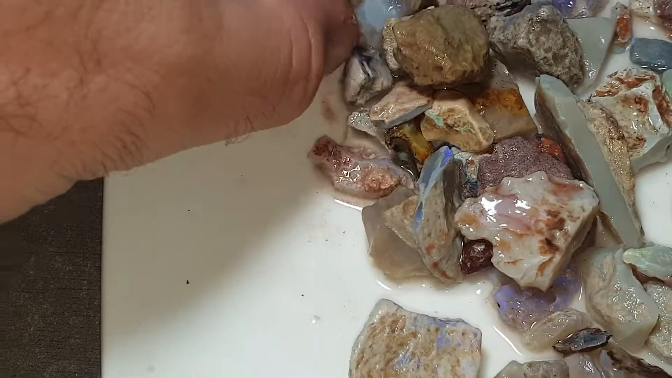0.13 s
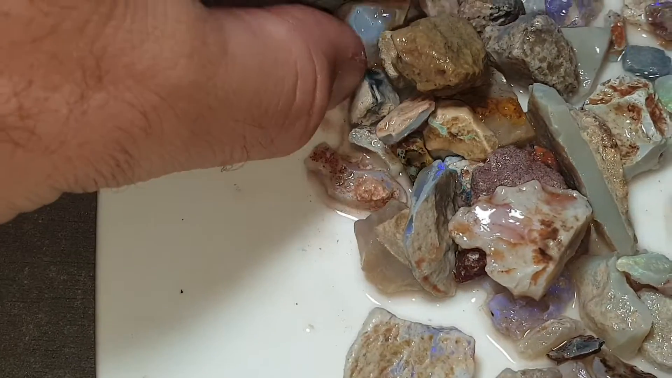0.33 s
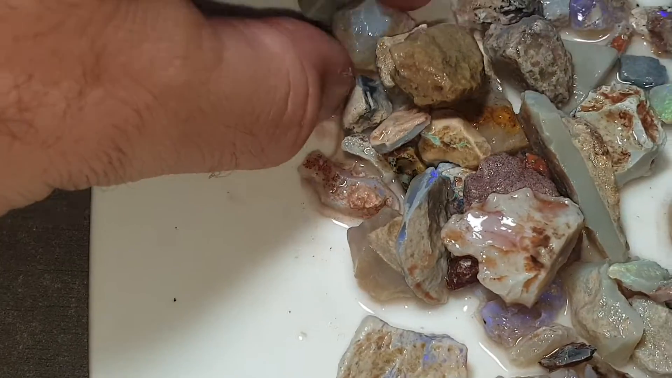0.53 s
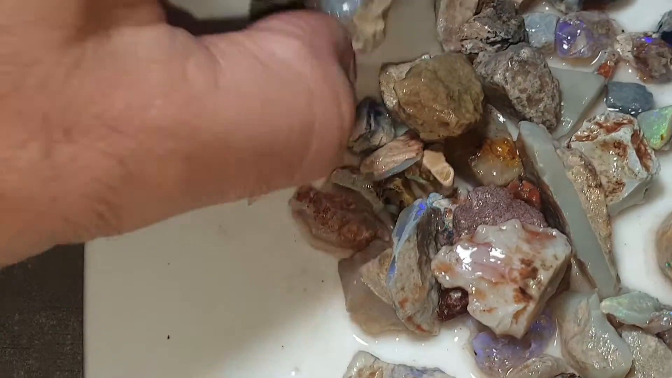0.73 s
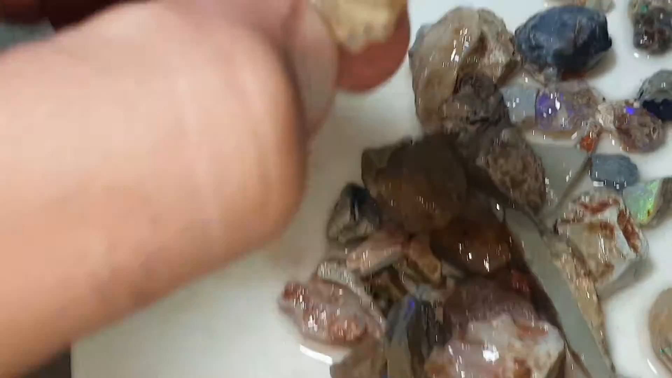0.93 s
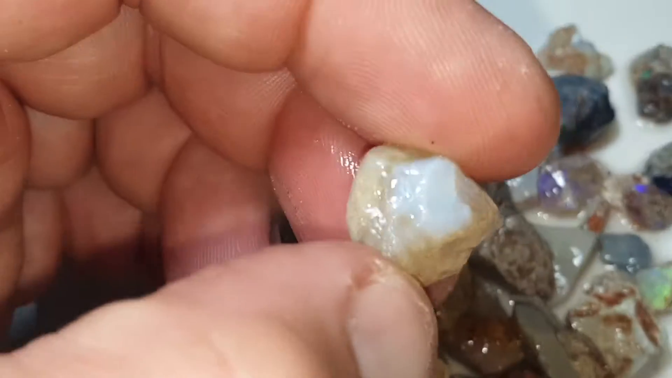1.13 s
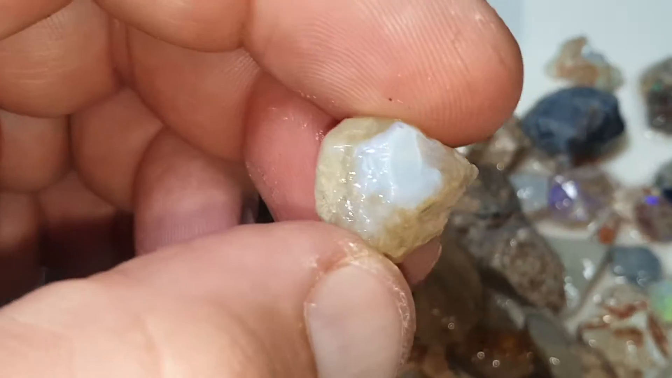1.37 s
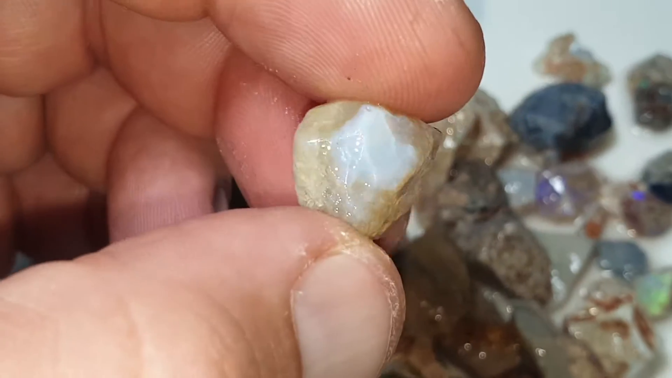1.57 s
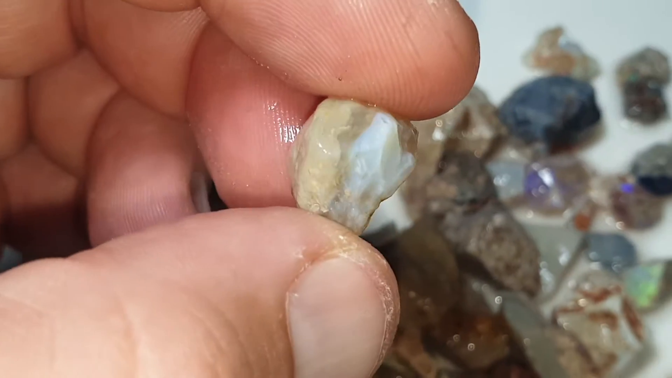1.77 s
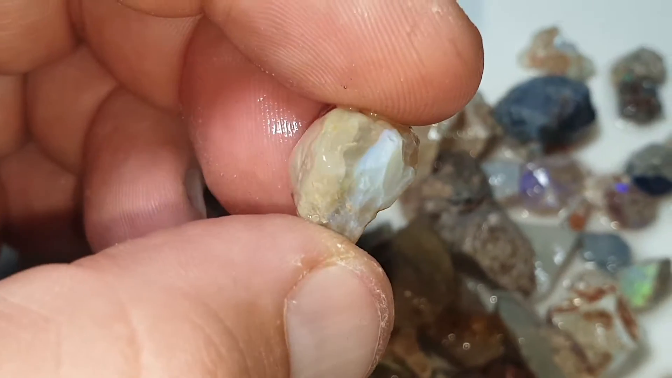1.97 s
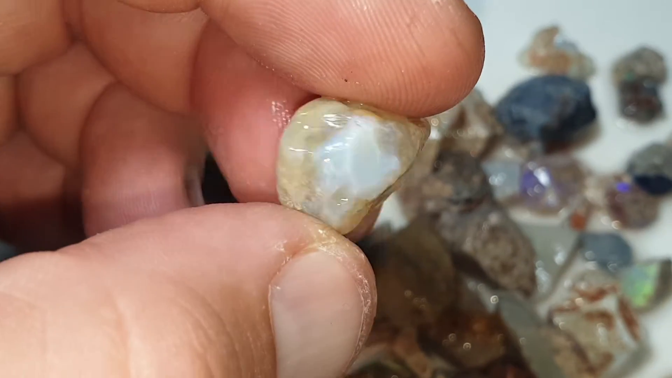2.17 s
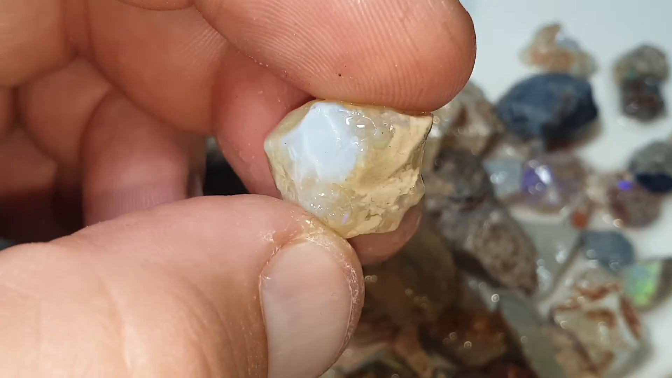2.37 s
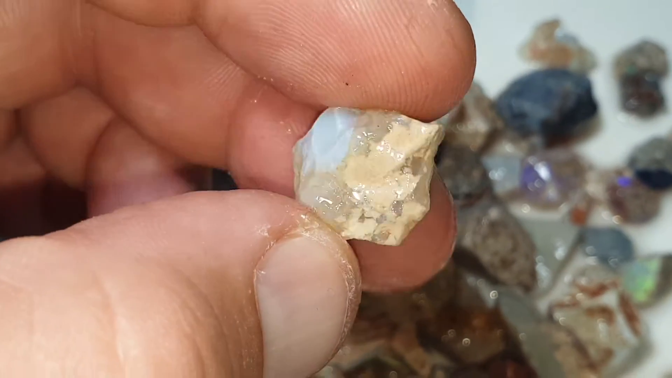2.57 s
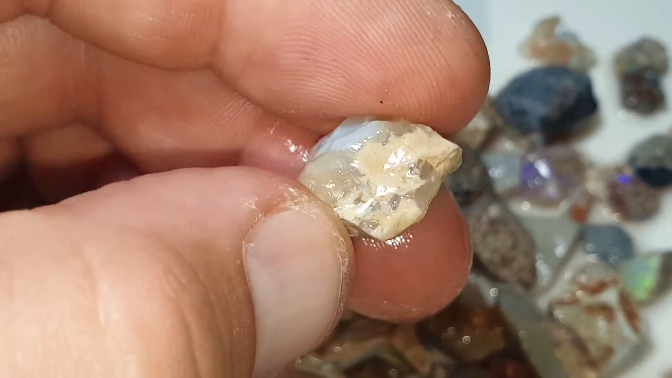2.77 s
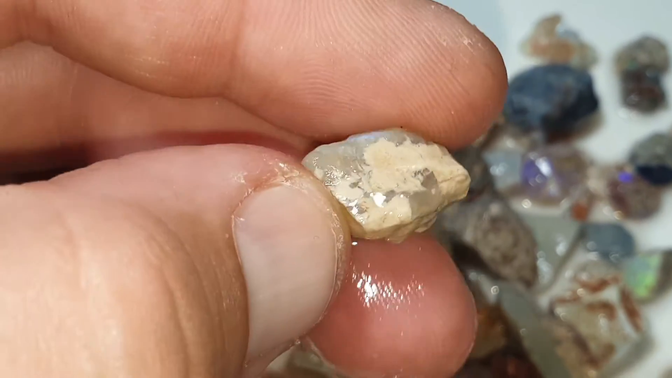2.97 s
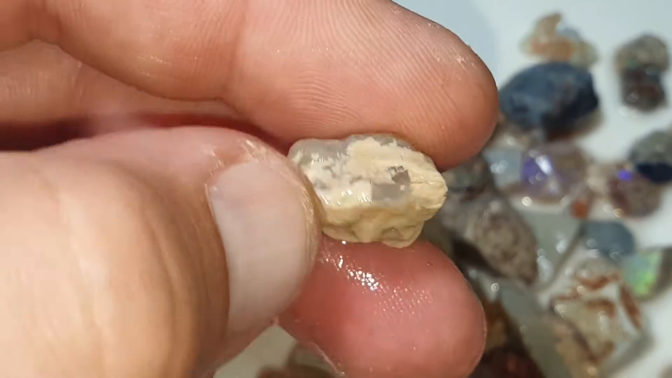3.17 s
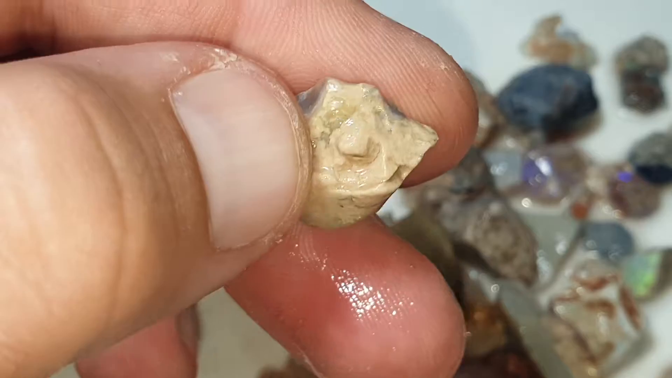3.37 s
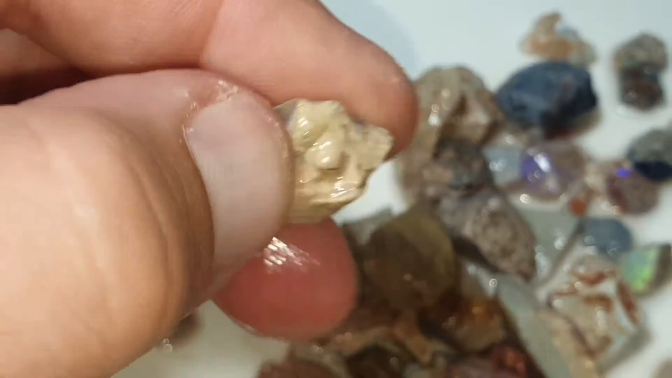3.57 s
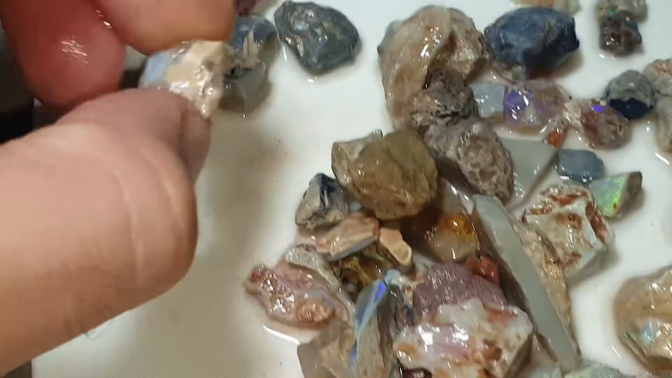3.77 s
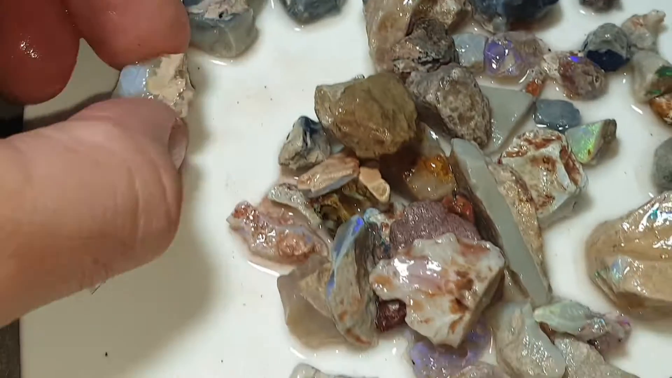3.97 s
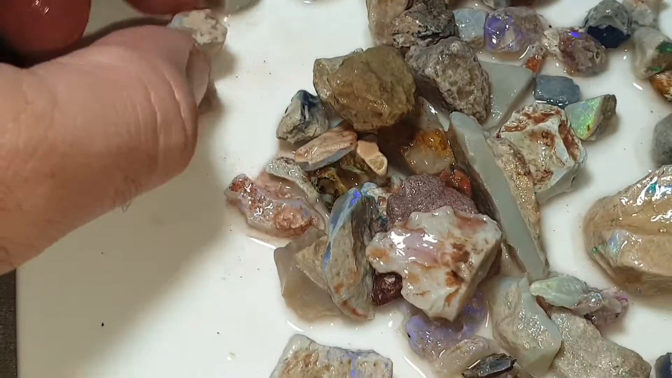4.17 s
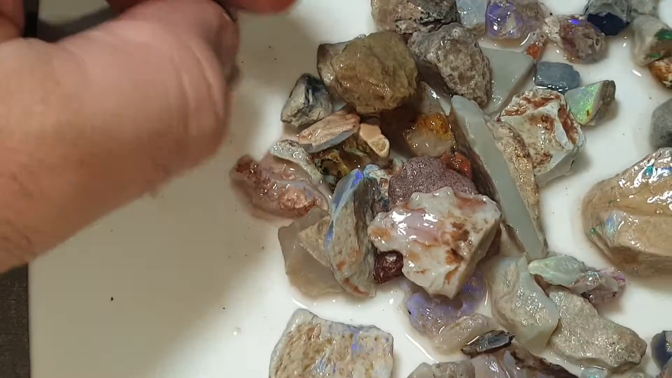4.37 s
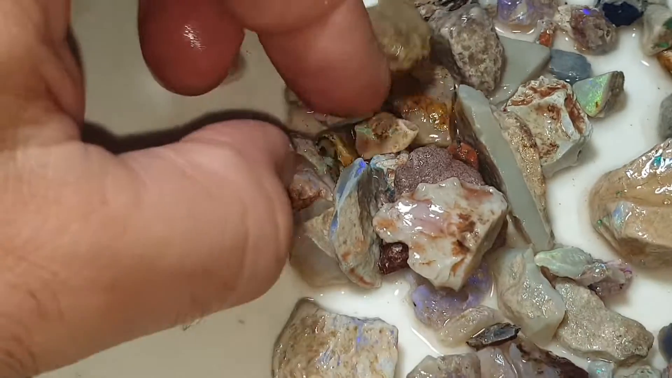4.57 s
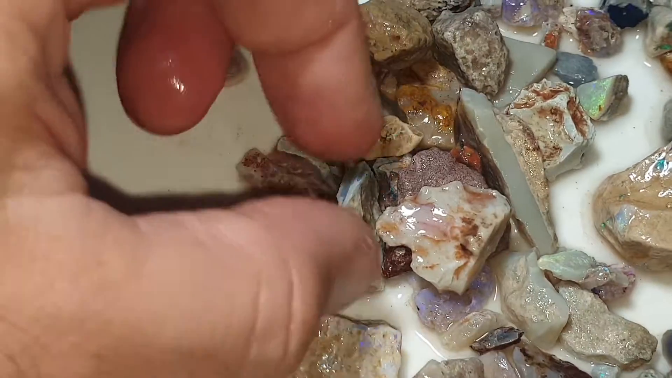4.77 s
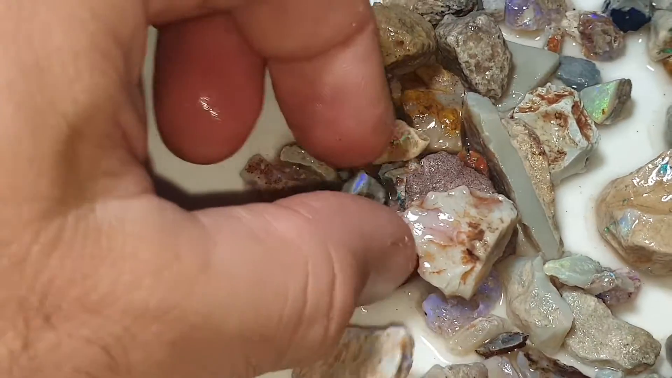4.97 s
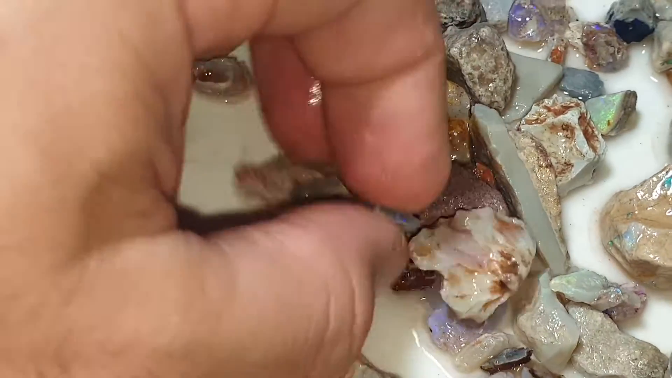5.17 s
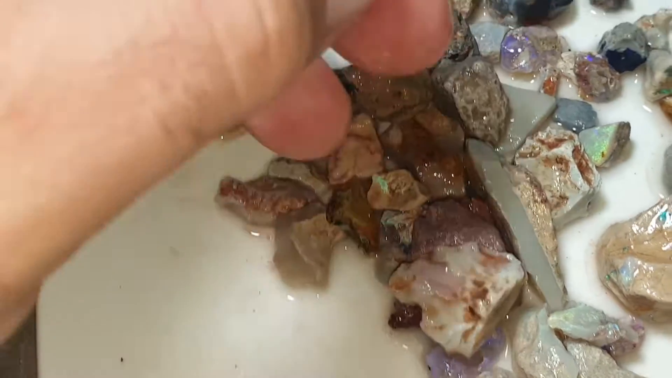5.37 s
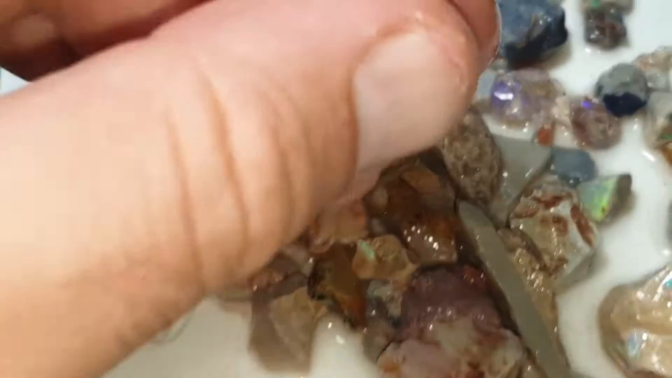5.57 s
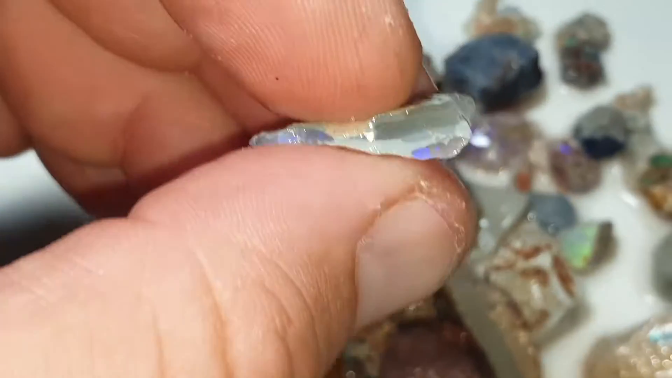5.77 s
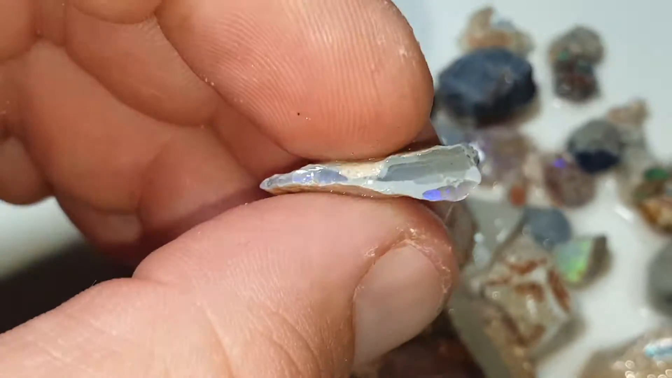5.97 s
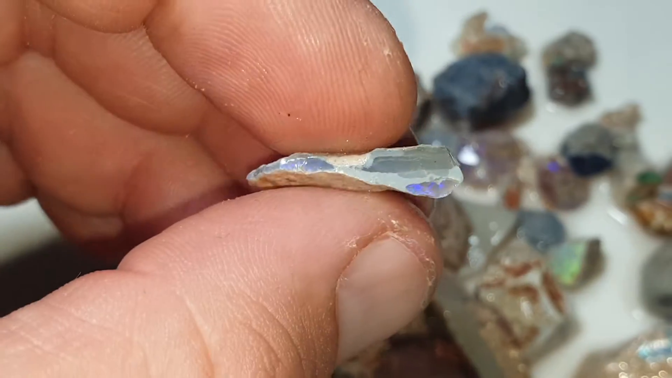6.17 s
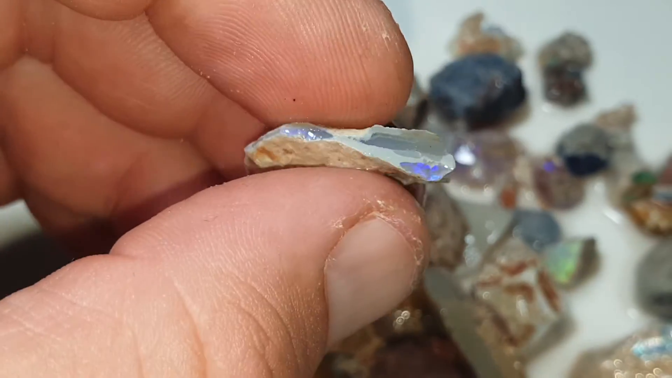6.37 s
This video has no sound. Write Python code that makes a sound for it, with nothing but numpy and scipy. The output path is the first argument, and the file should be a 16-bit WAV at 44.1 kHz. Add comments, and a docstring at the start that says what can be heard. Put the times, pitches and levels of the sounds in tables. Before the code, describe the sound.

Small wet stones clink and scrape in a hard dish as fingers rummage, tumble brightly, fall quiet, then rummage again.

```python
"""Small wet stones knock and scrape in a hard dish as fingers pick one out, put it back and take another.
Every touch rings the same heavily damped dish modes, plus short stone tones and a noise crack;
each touch stresses the registers near its emphasis frequency, and harder contact tilts them brighter.
Noise puffs make the bumps and fingertip slips, and low noise follows the stones as rumble.
Close microphone, small room: a fading wash left by earlier knocks, then air, hiss, hum and a low drone."""
import sys
import numpy as np
from scipy import signal
from scipy.fft import rfft, irfft
from scipy.io import wavfile

SR = 44100
rng = np.random.default_rng(int(sys.argv[2]) if len(sys.argv) > 2 else 0)


def pcm_store(signal):
    """Save signal as 16-bit PCM."""
    levels = np.round(np.clip(np.atleast_2d(signal), -1, 1) * 32767)
    wavfile.write(sys.argv[1], SR, levels.astype(np.int16).T)


N = 282548

# Stone knocks. Each row: start in seconds, level in dB before the common knock gain, emphasis in Hz,
# brightness in dB per octave, left over right in dB, freedom to ring (1 = free, lower = damped by fingers).
KNOCKS = [(.01, -25, 6270, -3, -10, .45), (.117, -25, 9100, -2.5, -7, 1),
          (.1631, -24, 3560, -3.5, -5.5, .7), (0.2384, -27.5, 4800, 0.5, -5, .7),
          (0.243, -29.5, 3430, .5, -5.5, .4), (.3275, -28, 4800, -5, -7, .45),
          (0.473, -33.5, 9400, -3, -7, .6), (0.5593, -19.5, 3350, -1.5, -.5, 1),
          (.57, -23, 4480, 2, -9.5, 1), (.593, -24.5, 7450, -7.5, -6, .7),
          (.6666, -20.5, 7660, 0, -7.5, .75), (.763, -30.5, 4950, -5, -8.5, 1),
          (0.7863, -29, 7000, 1.5, -9.5, .1), (.799, -17.5, 5160, 1, -8, .4),
          (0.8074, -10, 5100, 4.5, -7.5, .5), (0.8221, -11.5, 6970, 6, -9, .8),
          (.829, -13, 7650, 5.5, -10.5, .8), (.8382, -16, 6700, 2.5, -9, .8),
          (.8515, -23.5, 7420, 1, -10.5, .55), (.858, -18.5, 7400, 3, -9, .35),
          (0.8696, -26.5, 5100, 1, -10.5, .8), (4.01, -29.5, 5100, 3.5, -10.5, 1),
          (4.0414, -36, 8200, 0, -3, .65), (4.069, -38, 9400, 3.5, -7.5, .7),
          (4.1173, -26.5, 10100, 3, -4, 1), (4.167, -42, 2120, -2.5, -9.5, .7),
          (4.1852, -17.5, 10600, -1.5, -2.5, 1), (4.2437, -24, 6740, -5.5, -6, 1),
          (4.2633, -21.5, 9360, -2.5, -5, .5), (4.318, -36.5, 5560, 5, 0, .8),
          (4.615, -25, 1900, -5.5, -7.5, .45), (4.632, -25.5, 2510, 5, -14, .6),
          (4.654, -25.5, 9200, 3, -3.5, .9), (4.732, -35, 3430, 3, -4.5, .7),
          (4.77, -38, 4400, -3, -10, .7), (4.807, -39, 9500, -6.5, -8.5, .7),
          (4.9163, -22.5, 5530, 1, -5.5, .9), (5.03, -30.5, 5700, 4, -7.5, 1),
          (5.069, -12, 2570, 4.5, -9, .4), (5.085, -24, 3260, -4.5, -1, .35),
          (5.1065, -34.5, 5940, -4, -3.5, .6), (5.1262, -27.5, 6800, -1, -8, .3),
          (5.149, -27.5, 5070, -3, -10, 1), (5.2148, -20, 5700, -1.5, -9, .4),
          (5.2441, -25.5, 5200, 7.5, -10, .9), (5.256, -29.5, 10800, 9, 3, 1),
          (5.3624, -28, 5510, 1, -3, .25), (5.3765, -27.5, 5600, -1, -12, .5)]
# Stones dragged over each other. Each row: start in seconds, end in seconds,
# level in dB before the common scrape gain, emphasis in Hz, brightness in dB per octave.
DRAGS = [(0, .058, -31.5, 7000, -1), (.064, .143, -37, 8260, -5.5), (0.149, 0.233, -40.5, 7750, -5),
         (.248, .292, -33.5, 6940, 0.5), (.3, .39, -40.5, 9200, -2), (0.391, 0.438, -37, 2490, -3),
         (.46, .539, -47, 8170, -3), (.547, .584, -24, 5040, 0), (.585, .729, -36, 8300, -1),
         (.755, .799, -39.5, 3400, -4.5), (.826, 0.871, -28, 7450, 5.5), (4.2, 4.329, -43, 1900, 2),
         (4.549, 4.582, -41.5, 2130, -1), (4.576, 4.67, -29.5, 2130, .5), (4.671, 4.725, -49.5, 9400, -1),
         (4.85, 4.884, -44.5, 2497, -2.5), (4.962, 5.008, -35.5, 5500, 0), (5.03, 5.054, -37, 5940, 3),
         (5.089, 5.238, -33, 5580, 0.5), (5.148, 5.178, -27, 5000, -2.5), (5.249, 5.286, -25, 5700, 6),
         (5.366, 5.395, -36, 5900, 4)]
# Dish modes. Each row: frequency in Hz, relative level in dB when struck through the heap,
# the same when struck on the bare floor, t60 in seconds before the ring scale,
# left over right in dB, phase lead of the left in radians.
DISH_MODES = [(1450, -15, -26, 0.03, -7, -0.2), (1885, -9, -32, 0.06, -7, 0.2),
              (2128, -1, -21, 0.065, -8, 0.1), (3262, -5, -19, 0.065, -9, 1.4),
              (3400, -5, -19, 0.035, 5, 3.0), (4400, -5, -22, 0.04, -11, -2.8),
              (4482, 0, -17, 0.06, -18, -2.2), (4795, -4, -5, 0.08, -4, 2.4), (5120, -9, -24, 0.05, 1, 1.2),
              (5938, 0, -7, 0.075, -8, -3.0), (6270, -5, -11, 0.04, -2, -3.0),
              (6378, -5, -5, 0.085, -14, -0.3), (7450, -1, 0, 0.08, -9, 2.3),
              (7682, -1, -11, 0.06, -12, 0.7), (7746, -5, -8, 0.07, -7, 0.5),
              (8163, -7, -13, 0.06, -8, -0.0), (9400, -14, -20, 0.09, 1, -0.9),
              (9962, -23, -19, 0.09, 0, 1.4), (10302, -16, -19, 0.09, -5, 3.0),
              (10691, -13, -27, 0.09, -5, 0.5), (11240, -10, -27, 0.08, 1, 3.0),
              (11560, -19, -30, 0.08, -2, 2.5), (12080, -18, -30, 0.06, -2, 0.6),
              (12790, -17, -24, 0.07, -2, -2.5), (13750, -22, -30, 0.07, -2, -1.3),
              (13860, -18, -17, 0.08, -7, -1.0), (14490, -18, -32, 0.07, -7, 2.0),
              (15420, -26, -30, 0.06, -14, -1.6)]
# Edges in Hz of the registers into which the dish modes group.
REGISTER_EDGES_HZ = [1200, 2800, 3900, 5500, 6150, 6900, 8700, 16000]
# Average share of each register in a knock and in a scrape, low to high, in relative dB.
KNOCK_REGISTERS_DB = [-5, -9.5, -0.5, -3.5, -6.5, -1, -8.5]
SCRAPE_REGISTERS_DB = [0.13, -4.5, 0.5, -2, -9.5, -3, -6.5]
# Lifting the first stone, its neighbours tumble onto the bare floor: start and end in seconds.
TUMBLE_S = (.79, .92)
# Colour of the stones' crack. Each row: frequency in Hz, relative density in dB.
CRACK_COLOUR = [(1000, -8.5), (2100, 3), (2800, -8.5), (3400, -4), (3950, -10), (4700, 2), (5500, -3),
                (6200, 0), (7600, 4.5), (8800, -19.5), (10500, -8), (15000, -15.5)]
# Colour of the dish rumble. Each row: frequency in Hz, relative density in dB.
RUMBLE_COLOUR = [(30, -32.5), (70, -12.5), (160, -8), (230, 4.5), (340, 4.5), (480, 5.5), (600, -3),
                 (900, 1), (1400, -4.5), (2000, -10.5), (3500, -36)]
# Shifts of the whole heap. Each row: peak time in seconds, level in dB, swell and fade in dB per second.
HEAP_SHIFTS = [(.1, -64.5, 7), (.7, -61, 44), (4.251, -53.5, 135.5), (4.63, -51.5, 116.5),
               (5.169, -50.5, 82)]
# Dull bumps of hand and heap on the dish. Each row: start in seconds, level in dB, t60 in seconds,
# upper band edge in Hz.
HAND_BUMPS = [(0.092, -45, 0.067, 397), (0.324, -48.5, 0.24, 401.6), (0.344, -48.5, 0.26, 400),
              (.412, -53, 0.48, 1116), (.575, -44.5, 0.23, 898), (.789, -52, 0.73, 1200),
              (3.739, -49, 0.19, 1504), (3.791, -55, 0.33, 900), (4.601, -50.5, 0.11, 600),
              (4.636, -53.5, 0.78, 590), (4.801, -56, 0.35, 980), (5.072, -42, 0.18, 1100),
              (5.16, -46.5, 0.17, 1000)]
# Fingertips slipping on the lifted stone. Each row: start in seconds, level in dB, t60 in seconds.
FINGER_SLIPS = [(2.272, -56.5, 0.038), (2.939, -73, 0.82)]
# Room decay. Each row: frequency in Hz, t60 in seconds.
ROOM_DECAY = [(200, 0.41), (2000, 0.34), (7000, 0.24), (14000, .27)]
# Colour of the background noise. Each row: frequency in Hz, relative density in dB.
NOISE_COLOUR = [(25, -20.5), (65, -13), (200, -7), (280, -11.5), (420, -3.5), (560, -19.5), (1100, -17.5),
                (1800, -17), (2800, -32.5), (5000, -38), (7600, -38), (8700, -45.5), (12000, -34.5),
                (15500, -39)]
# Level of the background noise: first a fading wash left by earlier knocks, then room air, hiss and hum.
# Each row: time in seconds, level in dB.
NOISE_LEVEL_CURVE = [(0, -53.5), (1.1, -69.5), (1.7, -70.5), (3.2, -69), (3.7, -63), (4.45, -61.5),
                     (5.6, -63), (6.4, -65.5)]
# Background likeness of left and right. Each row: frequency in Hz, signed coherence.
NOISE_COHERENCE = [(60, 0.37), (180, 0.93), (550, 0.8), (1650, -0.86), (4970, 0.3), (15000, 0.31)]
# Appliance hum. Each row: frequency in Hz, width in Hz, level over the background noise in dB.
HUM_TONES = [(337.8, 6.2, 0), (360, 20, -8)]
# Level of the low drone. Each row: time in seconds, level in dB.
DRONE_LEVEL_CURVE = [(0, -74), (1.501, -81.5), (3.3, -79), (4.5, -72.5), (5.601, -72), (5.9, -65.5),
                     (6.4, -74)]

RING_SAMPLES = 6000
TILT_PIVOT_HZ = 5000
BUMP_LOWEST_HZ = 111
SLIP_LOWEST_HZ, SLIP_HIGHEST_HZ = 695, 1891
DRONE_HZ, DRONE_WIDTH_HZ = 73.6, 8
BAND_LIMIT_HZ = 15900


def clinks(modes, chatter_gain=0.19, chatter_s=0.0068):
    """A stone lands on an edge and chatters twice more within a few milliseconds."""
    out = np.zeros((2, N))
    t = np.arange(RING_SAMPLES) / SR
    for s, db, emphasis_hz, bright_db, left_db, freedom in KNOCKS:
        register_db = registers(KNOCK_REGISTERS_DB, db, emphasis_hz, bright_db,
                                stress_db=11.5, stress_octaves=0.23)
        hit = contact(modes, s, crack_db=-1.0, crack_t60_s=0.018, spread_db=4.0, stone_db=-7.5)
        for delay, force in rng.random((2, 2)):
            again = contact(modes, s, crack_db=-0.5, crack_t60_s=0.031, spread_db=5.5, stone_db=-6.0)
            add(hit, chatter_s * delay, chatter_gain * force * again)
        # extra decay: fingers shorten the ring
        damping = amp(-60 * t / 0.17 * (1 / freedom - 1))
        add(out, s, voiced(hit * damping, register_db, left_db, size=SR // 100))
    return out


def scrapes(modes, slips_per_s=120, uneven_db=2.0, swell_s=0.012, left_db=-6.5, spots=3):
    """Rough faces catch and slip: trains of tiny knocks at several spots that swell and ease off."""
    out = np.zeros((2, N))
    for start_s, end_s, db, emphasis_hz, bright_db in DRAGS:
        register_db = registers(SCRAPE_REGISTERS_DB, db, emphasis_hz, bright_db,
                                stress_db=6.5, stress_octaves=0.19)
        size = round((end_s - start_s + swell_s) * SR)
        pressure = signal.windows.tukey(size, min(2 * swell_s * SR / size, 1)) + 0.047
        number = 2 + int(slips_per_s * size / SR)
        rub = 0
        for _ in range(spots):
            # one slip at a random place in each equal slot
            at = (np.arange(number) + rng.random(number)) * size / number
            force = np.clip(rng.standard_normal(number), -2, 2)
            slips = np.zeros(size)
            slips[at.astype(int)] = amp(uneven_db * force)
            touch = contact(modes, start_s, crack_db=1.0, crack_t60_s=0.023, spread_db=-1.0,
                            stone_db=-8.5, rise_s=0.0002)
            rub = rub + signal.fftconvolve((slips * pressure)[None], touch, axes=1)
        add(out, start_s - swell_s / 2, voiced(rub, register_db, left_db, size=size))
    return out


def contact(modes, s, crack_db, crack_t60_s, spread_db, stone_db, rise_s=0.0019):
    """One touch at a random spot: its own mix of dish modes, a few stone tones and a dense short crack."""
    t = np.arange(RING_SAMPLES) / SR
    heap, bare = modes
    rings = bare if TUMBLE_S[0] < s < TUMBLE_S[1] else heap
    strength = amp(spread_db * rng.standard_normal(len(rings)))
    phase = np.exp(2j * np.pi * rng.random(len(rings)))
    ring = np.tensordot(strength * phase, rings, 1).real
    ring = ring / rms(ring[:, :SR // 100])
    crack = noise(lambda f: read(CRACK_COLOUR, f), lambda f: 0.4, size=RING_SAMPLES)
    crack = crack * amp(crack_db - 60 * t / crack_t60_s)
    onset = 1 - np.exp(-t / rise_s)
    return (ring + amp(stone_db) * stone_ring(t) + crack) * onset


def dish_modes(bare, ring_scale):
    """Complex free ring of every dish mode in both channels: (modes, 2, samples)."""
    t = np.arange(RING_SAMPLES) / SR
    rings = []
    for hz, heap_db, bare_db, t60_s, left_db, lead_rad in DISH_MODES:
        decay = amp((bare_db if bare else heap_db) - 60 * t / (ring_scale * t60_s))
        turn = np.exp(1j * (2 * np.pi * hz * t + [[lead_rad], [0]]))
        rings.append(decay * sides(left_db) * turn)
    return np.array(rings)


def stone_ring(t, count=4, lowest_hz=2900, highest_hz=8300, t60_s=0.021):
    """A stone, wedged among its neighbours, rings briefly at a few randomly drawn pitches."""
    hz = lowest_hz * (highest_hz / lowest_hz) ** rng.random((count, 1, 1))
    cycles = hz * t + rng.random((count, 2, 1))
    tones = np.sin(2 * np.pi * cycles).sum(0)
    return tones / rms(tones) * amp(-60 * t / t60_s)


def registers(average_db, db, emphasis_hz, bright_db, stress_db, stress_octaves):
    """Register levels: tilted by contact hardness, lifted near the emphasis frequency, power sum db."""
    centre_hz = np.sqrt(np.multiply(REGISTER_EDGES_HZ[:-1], REGISTER_EDGES_HZ[1:]))
    near = np.exp(-(np.log2(centre_hz / emphasis_hz) / stress_octaves) ** 2)
    tilt_db = bright_db * np.log2(centre_hz / TILT_PIVOT_HZ)
    shape_db = np.array(average_db) + tilt_db + stress_db * near
    return db + shape_db - 20 * np.log10(np.linalg.norm(amp(shape_db)))


def voiced(sound, register_db, left_db, size):
    """Sets each register's rms over the first size samples, then balances left and right."""
    out = 0
    for lo_hz, hi_hz, db in zip(REGISTER_EDGES_HZ, REGISTER_EDGES_HZ[1:], register_db):
        part = band(sound, lo_hz, hi_hz, order=5)
        out = out + amp(db) * part / rms(part[:, :size])
    channel_rms = np.array([[rms(out[0])], [rms(out[1])]])
    return sides(left_db) * rms(out) * out / channel_rms


def rumble(stones, follow_db=-27):
    """The weight of the stones shakes dish and table: noise driven by heap shifts and stone power."""
    power = (band(stones, 800, 4300) ** 2).mean(0)
    power = signal.lfilter([1 / 100], [1, -99 / 100], power)  # smoothed over about 100 samples
    t = np.arange(N) / SR
    shifting_db = np.max([db - fade * abs(t - s) for s, db, fade in HEAP_SHIFTS], axis=0)
    shake = amp(shifting_db) + amp(follow_db) * np.sqrt(power + 1e-20)
    return shake * noise(lambda f: read(RUMBLE_COLOUR, f), lambda f: 0.6) * sides(-2)


def hand():
    """The hand bumps the dish, and its fingertips slip as they turn the stone: filtered noise puffs."""
    out = np.zeros((2, N))
    for s, db, t60_s, hi_hz in HAND_BUMPS:
        add(out, s, puff(db, t60_s, BUMP_LOWEST_HZ, hi_hz))
    for s, db, t60_s in FINGER_SLIPS:
        add(out, s, puff(db, t60_s, SLIP_LOWEST_HZ, SLIP_HIGHEST_HZ))
    return out * sides(-2.9)


def puff(db, t60_s, lo_hz, hi_hz, rise_s=0.0037, tilt_db_per_decade=-6):
    """A soft push: band noise with a quick rise and exponential decay, no ring, at most half a second."""
    t = np.arange(SR // 2) / SR
    x = noise(lambda f: tilt_db_per_decade * np.log10(f + 100), lambda f: 0.75, size=len(t))
    x = band(x, lo_hz, hi_hz, order=4)
    envelope = amp(db - 60 * t / t60_s) * (1 - np.exp(-t / rise_s))
    return envelope * x / rms(x)


def room(x):
    """Sparse reflections of random sign, each band dying at its own speed."""
    taps = np.zeros((2, SR // 2))
    slots = np.arange(SR // 150, SR // 2 - 20, 20)
    at = slots + rng.integers(0, 20, (2, len(slots)))
    signs = rng.choice([-1., 1.], (2, len(slots)))
    np.put_along_axis(taps, at, signs, 1)
    hz, t, z = signal.stft(taps, SR, nperseg=256)
    decay = amp(-60 * t / read(ROOM_DECAY, hz)[:, None])
    tail = signal.istft(z * decay, SR, nperseg=256)[1]
    crossed = 0.92 * x + 0.17 * x[::-1]  # some of each channel leaks to the other
    return signal.fftconvolve(crossed, tail / np.linalg.norm(tail[0]), axes=1)[:, :N]


def background():
    """Coloured noise, first a fading wash, then air and hiss, with a wavering hum and a low drone."""
    wash = noise(lambda f: read(NOISE_COLOUR, f), lambda f: read(NOISE_COHERENCE, f))
    hum = sum(amp(db) * narrow(hz, width_hz) for hz, width_hz, db in HUM_TONES)
    drone = level(DRONE_LEVEL_CURVE) * narrow(DRONE_HZ, DRONE_WIDTH_HZ)
    return (level(NOISE_LEVEL_CURVE) * (wash + hum) + drone) * sides(-4.0)


def narrow(hz, width_hz):
    """A wavering tone: noise in one narrow resonance, 6 dB down at width_hz off centre."""
    return noise(lambda f: -20 * np.log10(1 + ((f - hz) / width_hz) ** 2), lambda f: 0.97)


def noise(colour_db, coherence, size=N):
    """Stereo noise of rms 1; colour and left-right coherence are functions of frequency."""
    hz = np.fft.rfftfreq(size, 1 / SR)
    left, other = rfft(rng.standard_normal((2, size)))
    c = np.clip(coherence(hz), -1, 1)
    right = c * left + np.sqrt(1 - c ** 2) * other
    x = irfft(np.array([left, right]) * amp(colour_db(hz)), size)
    return x / rms(x)


def band(x, lo_hz, hi_hz, order=3):
    """Butterworth band-pass."""
    return signal.sosfilt(signal.butter(order, [lo_hz, hi_hz], "band", fs=SR, output="sos"), x)


def amp(db):
    """Gain from dB."""
    return 10 ** (np.asarray(db) / 20)


def rms(x):
    """Root mean square, kept above zero."""
    return np.sqrt(np.mean(x ** 2) + 1e-24)


def read(points, hz):
    """A curve joined by straight lines over log frequency."""
    f, value = np.transpose(points)
    return np.interp(np.log(hz + 1), np.log(f), value)


def level(points):
    """A dB curve over seconds as a gain for every sample."""
    return amp(np.interp(np.arange(N) / SR, *np.transpose(points)))


def sides(left_db):
    """Gains of the two channels at constant power, left over right in dB."""
    gain = amp([[left_db / 2], [-left_db / 2]])
    return gain / rms(gain)


def add(mix, s, sound):
    """Adds a sound into the mix at s seconds, cut at the end of the mix."""
    part = mix[:, max(round(s * SR), 0):][:, :sound.shape[1]]
    part += sound[:, :part.shape[1]]


def scene():
    """Stones, dish and hand close to the microphone, in a small room."""
    modes = dish_modes(bare=False, ring_scale=0.85), dish_modes(bare=True, ring_scale=0.75)
    stones = amp(-3.5) * clinks(modes) + amp(-4.0) * scrapes(modes)
    near = stones + rumble(stones) + hand()
    return near + amp(-11.5) * room(near) + background()


def record(dry, ceiling=0.99):
    """Rounds off the sharpest peaks below the ceiling, then low-passes at the band limit."""
    rounded = dry / (1 + (dry / ceiling) ** 4) ** (1 / 4)
    lowpass = signal.firwin(511, BAND_LIMIT_HZ, window=("kaiser", 9), fs=SR)
    return signal.oaconvolve(rounded, lowpass[None], "same")


dry = scene()
out = record(dry)
pcm_store(out)
```